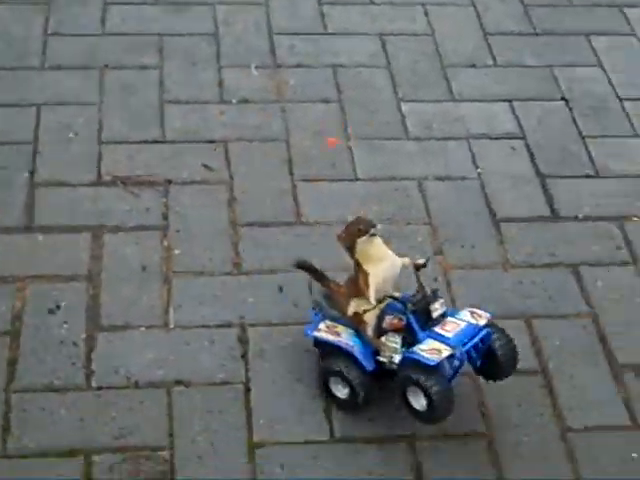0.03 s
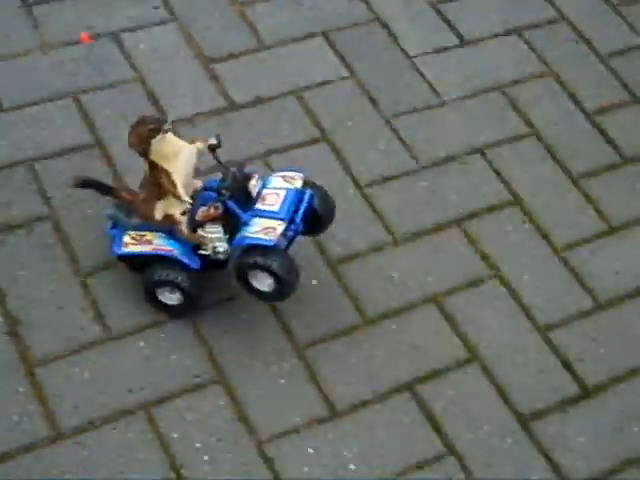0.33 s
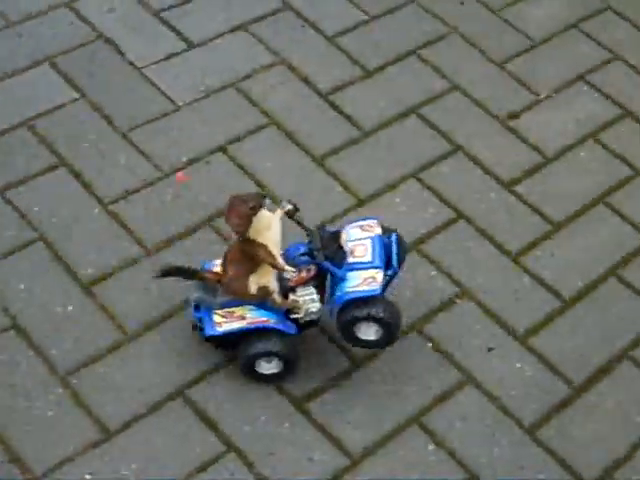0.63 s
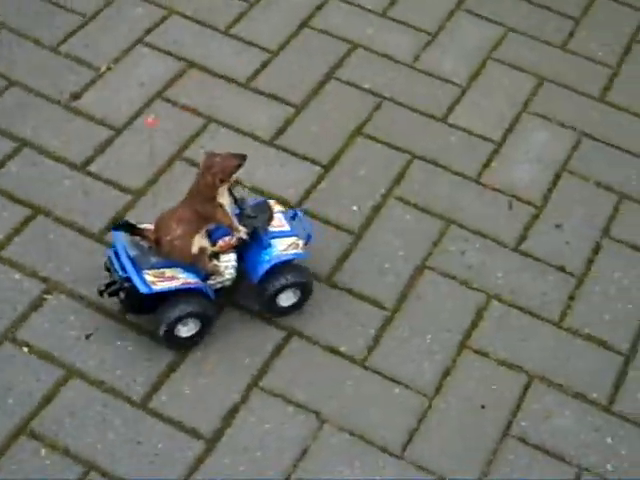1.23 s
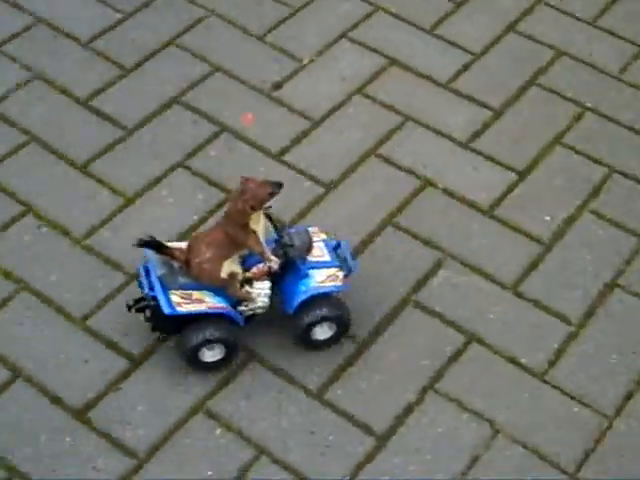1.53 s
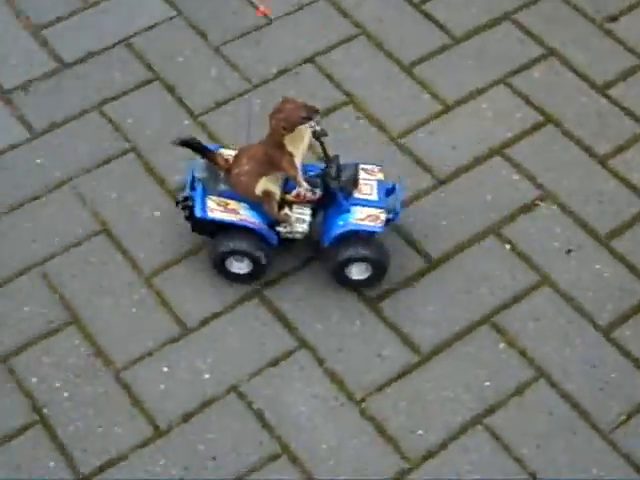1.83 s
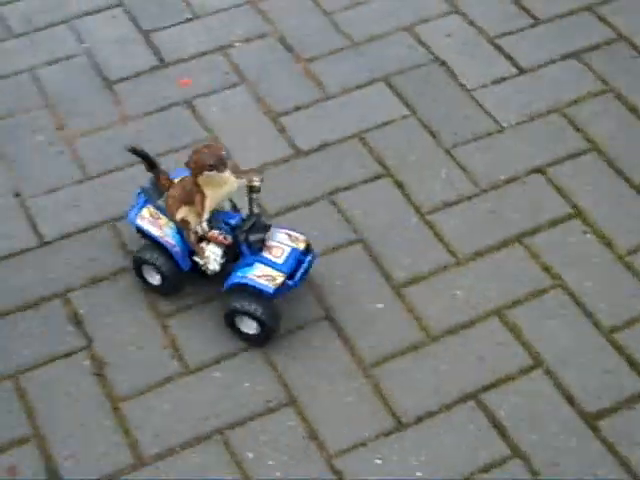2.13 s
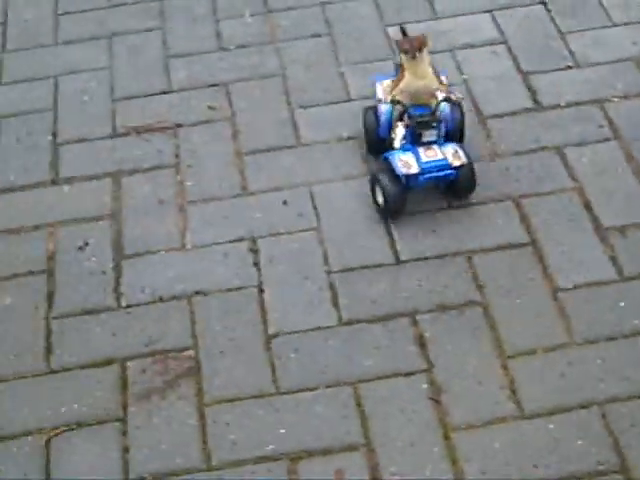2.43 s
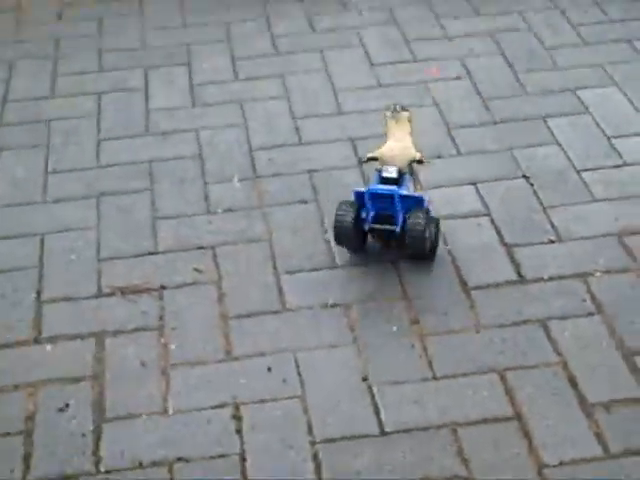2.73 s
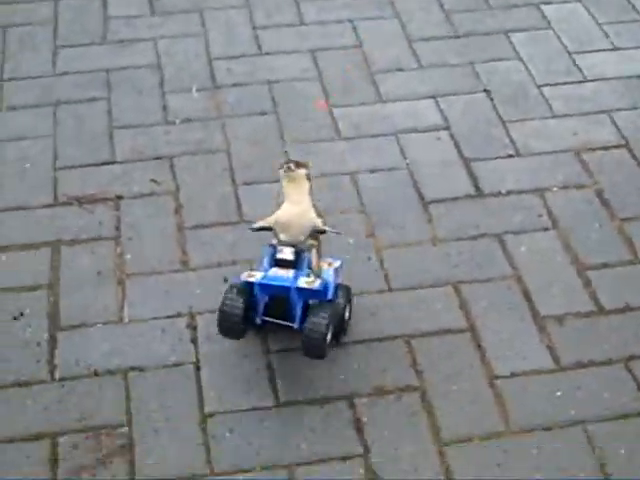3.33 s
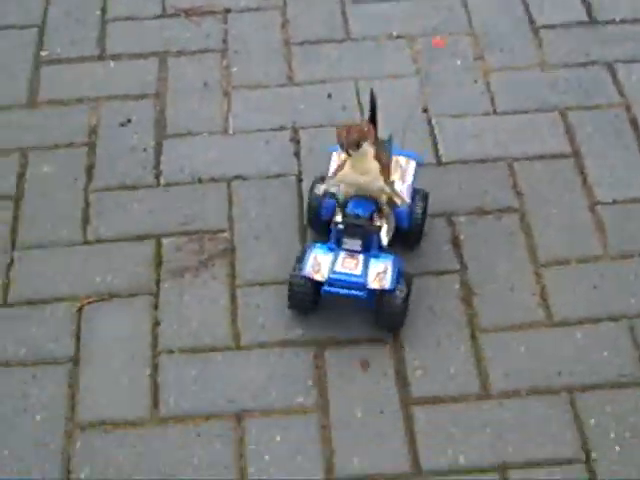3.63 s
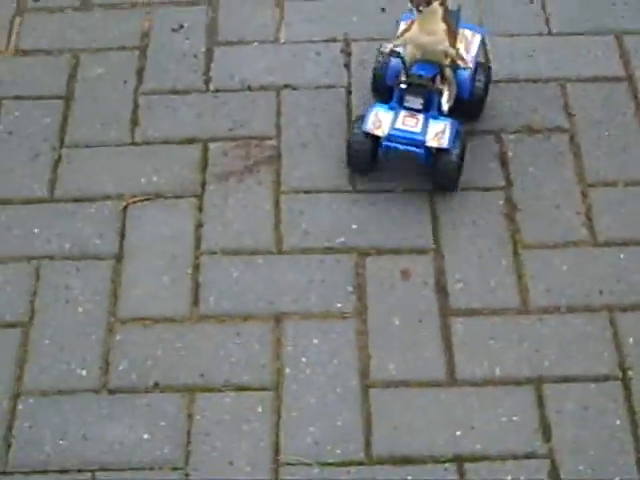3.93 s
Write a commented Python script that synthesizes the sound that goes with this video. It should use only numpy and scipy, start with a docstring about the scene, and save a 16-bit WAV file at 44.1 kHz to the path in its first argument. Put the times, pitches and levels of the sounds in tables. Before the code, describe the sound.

Close to the microphone outdoors, a small toy vehicle's motor whirs with a rough, wavering whine. Its wheels scrape on paving, patter through a run of quick taps and scrape again, while the hollow plastic body rattles over bumps.

```python
"""Outdoors on paving blocks, a battery toy quad bike drives along close by.
Its gears whine and rattle the hollow plastic shell. The tyres scuff and groan, their tread bumps
slap the stone, and the whole toy clatters when it drops or meets a joint in the paving.
Nearby walls echo it, and a faint outdoor rumble lies underneath."""
import sys
import numpy as np
from scipy import signal
from scipy.fft import rfft, irfft
from scipy.io import wavfile
from scipy.ndimage import uniform_filter1d

SR = 44100
rng = np.random.default_rng(int(sys.argv[2]) if len(sys.argv) > 2 else 0)


def materialize(psi):
    """Save the field psi as 16-bit PCM at rate SR to the path in sys.argv[1].

    A 1-D psi becomes a single channel; in a 2-D psi each row is a channel.
    """
    bounded = np.clip(np.atleast_2d(psi).T, -1, 1)
    quanta = np.round(bounded * 32767).astype(np.int16)
    wavfile.write(sys.argv[1], SR, quanta)


N = 176400
TIME = np.arange(N) / SR

# The shell rings in four bands, low to high: boom, hollow, panels, treble.
# Its usual ringing notes in the top two bands: pitch_hz, width_hz, level_db
PANEL_NOTES = [(1350, 320, 0), (1601, 190, 1.5), (1930, 500, -5), (2534, 420, -2), (3110, 670, -4)]
TREBLE_NOTES = [(4410, 670, 0.5), (5330, 800, 0.5), (6100, 820, 0), (7490, 1400, -4)]


def gears():
    """Loose plastic teeth clash unevenly and keep the shell whirring."""
    # How hard they shake each band: time_s, boom_db, hollow_db, panels_db, treble_db
    shaking = [(0,-60.5,-49,-47,-47.5),(0.149,-64,-48,-50.5,-51.5),(.2,-66.5,-50.5,-47,-56),(.4,-66.5,-52,-52,-50.5),(.53,-65.5,-56.5,-57.5,-62),(.7,-65.5,-51,-50.5,-53.5),
               (0.851,-62.5,-57,-50,-49.5),(1.42,-67,-48.5,-54,-54),(1.55,-60.5,-46.5,-47.5,-48.5),(1.76,-70,-49,-50.5,-50.5),(1.87,-67.5,-54.5,-59,-59),
               (2.03,-67,-46,-49,-48.5),(2.15,-66,-54.5,-50,-51),(2.42,-59.5,-53.5,-49,-48),(2.95,-60.5,-54,-47,-48.5),(3.08,-63,-51.5,-48.5,-49),
               (3.158,-67,-55,-54,-52.5),(3.275,-67,-60.5,-58,-61),(3.335,-65.5,-50.5,-47.5,-52),(3.471,-64.5,-55,-53.5,-55),(3.58,-75,-56,-50.5,-55),
               (3.81,-69,-55,-50,-57),(4.0,-68,-48.5,-49,-51)]
    times, *bands = np.transpose(shaking)
    wobble_db, flicker_db, wobble_hz = 3, 1.6, 55
    teeth = clicks(per_s=3200, spread_db=2) * from_db(-1 + wobble_db * drift(wobble_hz))
    levels_db = [np.interp(TIME, times, db) + flicker_db * drift(wobble_hz) for db in bands]
    return shell(teeth * from_db(levels_db))


def gear_whine():
    """The gears' tones glide with motor speed; slack between the teeth makes them rough."""
    # The course of the whine: time_s, pitch_hz, level_db
    glide = [(0,2736,-49),(0.502,2743,-82),(0.802,2814,-43),(1.302,2838,-48),(1.8,2776,-49.5),(2.3,2733,-43.5),
             (2.582,2930,-42),(3.0,3052,-47),(3.25,2842,-59),(4.0,2876,-49.5)]
    # The tones in it: pitch_ratio, blur_hz, level_db
    tones = [(.36, 120.7, -6), (.505, 109, -13), (1, 380.4, -7)]
    times, hz, db = np.transpose(glide)
    phase = 2 * np.pi * np.cumsum(np.interp(TIME, times, hz)) / SR
    whine = sum(from_db(level) * rough_tone(ratio * phase, blur) for ratio, blur, level in tones)
    return from_db(np.interp(TIME, times, db)) * whine


def gear_case():
    """Under steady load, the teeth make the gear case sing for a while."""
    # Sung notes: middle_s, half_length_s, pitch_hz, level_db
    notes = [(1.04, 0.2, 4600, -51.5), (1.1, 0.27, 1359, -53), (2.368, 0.033, 2686, -44),
             (2.881, 0.22, 3380, -53.5)]
    return swelling_tones(notes, blur_hz=276)


def tyre_scuffs():
    """Tyres drag over the gritty stone in short, juddering swells."""
    # Scuffs: middle_s, half_length_s, hollow_db, panels_db, treble_db
    scuffs = [(0.048, 0.092, -68, -44.5, -48.5), (0.127, 0.022, -41.5, -37.5, -41),
              (0.222, 0.0085, -45.5, -59, -42), (0.38, 0.055, -47, -46, -52),
              (0.471, 0.029, -40.5, -38.5, -42), (0.573, 0.026, -43.5, -42, -48.5),
              (0.654, 0.028, -42.5, -41.5, -44), (0.73, 0.014, -41, -39.5, -44.5),
              (0.764, 0.013, -38.5, -35, -34), (0.799, 0.024, -41, -35.5, -35),
              (0.877, 0.018, -54, -41.5, -43), (0.958, 0.023, -45, -44, -42),
              (1.015, 0.027, -42.5, -41.5, -43.5), (1.079, 0.025, -44.5, -40, -47),
              (1.142, 0.021, -48.5, -40, -51), (1.206, 0.022, -47, -38.5, -41),
              (1.271, 0.018, -46, -39, -40.5), (1.327, 0.022, -41, -37.5, -38.5),
              (1.49, 0.022, -39.5, -36, -37), (1.644, 0.039, -44, -38.5, -43),
              (2.796, 0.035, -47, -50, -44), (3.424, 0.022, -38.5, -38.5, -39),
              (3.534, 0.016, -42, -47, -56), (3.672, 0.027, -49, -39.5, -40),
              (3.735, 0.045, -43, -40.5, -43.5), (3.84, 0.014, -42.5, -41, -49),
              (3.946, 0.061, -47, -35, -38)]
    # Shell notes under a sliding tyre: pitch_hz, width_hz, level_db
    panel_notes = [(1445, 390, -3), (2050, 460, -4.5), (2880, 740, -3)]
    treble_notes = [(4500, 700, 0.5), (5440, 1030, -1.5), (6000, 770, -0.5), (7440, 1300, -6.5)]
    swells = sum(np.outer(from_db(db), swell(middle, half)) for middle, half, *db in scuffs)
    grit = clicks(per_s=2200, spread_db=1)
    judder = from_db(-5.5 + 2 * drift(rate_hz=82))
    return contact(swells, grit * judder, panel_notes, treble_notes)


def tread_slaps():
    """Each tread bump lands with a short, bright rasp and a tiny squeak at its own pitch."""
    # Landings: start_s, level_db, hollow_extra_db
    landings = [(1.3611, -30.5, -18), (1.53, -30, -14), (1.696, -30.5, -0.5), (1.74, -32.5, 1.5),
                (1.7849, -32.5, -0.5), (1.8301, -33, -3.5), (1.9584, -33.5, -0.5), (1.9953, -31.5, 2),
                (2.0374, -34, -13), (2.0598, -37, 8.5), (2.12, -28, -9), (2.158, -28, -21),
                (2.1786, -30.5, -1.5), (2.2339, -28, -6), (2.2685, -28.5, -3), (2.2947, -36.5, -0.5),
                (2.3217, -37, -5), (2.3386, -29, -5), (2.373, -29, -17), (2.3974, -31.5, -20),
                (2.438, -31, 0), (2.4832, -29, -22), (2.5215, -29, -25), (2.5482, -29, -4),
                (2.6453, -31.5, -1), (2.6827, -29.5, -6.5), (2.709, -28, -19), (2.835, -31, -10),
                (2.8508, -34, -15), (2.875, -31.5, -18), (2.8932, -32, -16), (2.923, -31, -8),
                (2.9909, -35.5, -1), (3.0523, -30.5, -9), (3.2278, -37.5, 3.5), (3.923, -31.5, -11)]
    # Shell notes under a landing bump: pitch_hz, width_hz, level_db
    panel_notes = [(1410, 360, -2), (1910, 120, -4), (2896, 460, 3)]
    treble_notes = [(4490, 390, 2.5), (5700, 560, 1.5), (6040, 330, 2), (7180, 890, 2.5)]
    hollow_db, panels_db, treble_db = -9.5, -11, -13.5
    slaps, squeaks = 0, 0
    for start, db, extra_db in landings:
        touch = from_db(db) * burst(start, attack_s=0.00092, hold_s=0.003, fade_s=0.0062)
        slaps += np.outer(from_db([hollow_db + extra_db, panels_db, treble_db]), touch)
        squeak_hz = rng.uniform(5290, 6185)
        squeaks += touch * np.sin(2 * np.pi * squeak_hz * (TIME - start))
    return contact(slaps, chatter(), panel_notes, treble_notes) + from_db(-14) * squeaks


def knocks():
    """The toy hits the paving in a quick cluster of taps, then its loose parts rattle."""
    # Hits: start_s, length_s, hollow_db, panels_db, treble_db
    hits = [(0.104,0.0028,-31,-37,-28),(0.11,0.0051,-33.5,-35.5,-36.5),(0.45,0.002,-43,-37,-32.5),(0.462,0.0052,-43,-51,-44),
            (1.4052,0.0026,-37,-36,-34.5),(1.4451,0.0062,-35.5,-35,-36),(1.4785,0.0036,-33.5,-36,-39),(1.629,0.005,-28.5,-32.5,-32.5),
            (1.6347,0.0018,-23,-34,-31.5),(1.9024,0.0075,-38.5,-44.5,-49),(3.2857,0.0075,-46,-34.5,-39),(3.3181,0.001,-39.5,-44,-43),
            (3.3478,0.0028,-56,-36,-44.5),(3.4264,0.0016,-36,-38.5,-49)]
    blows = 0
    for start, length, *db in hits:
        blow = burst(start, attack_s=0.00032, hold_s=length, fade_s=0.00064)
        rattle = burst(start + length, attack_s=0.00032, hold_s=length, fade_s=0.011)
        blows += np.outer(from_db(db), blow + from_db(-14) * rattle)
    return contact(blows, chatter())


def pings():
    """A small, stiff part rings briefly on hard landings."""
    # Rings: start_s, pitch_hz, level_db
    rings = [(3.2883, 5200, -36), (3.301, 4850, -31), (3.3177, 5230, -30)]
    sound = 0
    for start, hz, db in rings:
        loudness = from_db(db) * burst(start, attack_s=0.00032, hold_s=0, fade_s=0.002)
        sound += loudness * np.sin(2 * np.pi * hz * (TIME - start))
    return sound


def tyre_groans():
    """A dragged tyre sticks and slips at an unsteady pitch."""
    # Groans: middle_s, half_length_s, pitch_hz, level_db
    groans = [(0.068, 0.034, 1480, -46.5), (0.36, 0.04, 1500, -47), (0.773, 0.025, 1240, -42.5),
              (3.39, 0.01, 1090, -45), (3.95, 0.04, 1440, -40)]
    return swelling_tones(groans, blur_hz=212.7)


def shell(forces, panel_notes=PANEL_NOTES, treble_notes=TREBLE_NOTES):
    """Four forces, one for each band, set the plastic shell ringing."""
    # Ringing notes in the two low bands: pitch_hz, width_hz, level_db
    boom_notes = [(304, 173, 2)]
    hollow_notes = [(720, 101, -3.5), (867, 119, -1), (1008, 146, -0.5)]
    # The range each band gives off: low_hz, high_hz
    ranges = [(170, 520), (620, 1274), (1150, 3520), (3800, 8860)]
    bands = (boom_notes, hollow_notes, panel_notes, treble_notes)
    tap = signal.unit_impulse(SR // 10)
    sound = 0
    for force, notes, edges in zip(forces, bands, ranges):
        ring = 0  # how this band answers one tap
        for k, (hz, width, db) in enumerate(notes):
            fade = np.exp(-np.pi * width / SR)  # wider notes die sooner
            feedback = [1, -2 * fade * np.cos(2 * np.pi * hz / SR), fade ** 2]
            note = (1 - fade ** 2) * signal.lfilter([1, 0, -1], feedback, tap)
            ring += (-1) ** k * from_db(db) * note
        ring = signal.sosfilt(signal.butter(2, edges, "band", fs=SR, output="sos"), ring)
        sound += signal.fftconvolve(force, ring / np.linalg.norm(ring))[:N]
    return sound


def contact(strengths, taps, panel_notes=PANEL_NOTES, treble_notes=TREBLE_NOTES):
    """Tiny taps on the stone shake the shell; the boom is a weaker share of the panels' force."""
    hollow, panels, treble = strengths * taps
    return shell([from_db(-19) * panels, hollow, panels, treble], panel_notes, treble_notes)


def clicks(per_s, spread_db):
    """Tiny random impacts of uneven size."""
    sizes = from_db(spread_db * np.minimum(rng.exponential(1, N), 4))
    signs = rng.choice([-1, 1], N)
    return unit_power(sizes * signs * (rng.random(N) < per_s / SR))


def chatter():
    """Dense, hard taps whose force is evened out over about 3 ms."""
    taps = clicks(per_s=4600, spread_db=2)
    return taps / np.sqrt(uniform_filter1d(taps ** 2, size=130) + 1e-3)


def swelling_tones(notes, blur_hz):
    """Rough tones that each fade in and out."""
    return sum(from_db(db) * swell(middle, half) * rough_tone(2 * np.pi * hz * TIME, blur_hz)
               for middle, half, hz, db in notes)


def rough_tone(phase, blur_hz):
    """A tone whose strength and pitch waver."""
    return unit_power(drift(blur_hz) * np.cos(phase) + drift(blur_hz) * np.sin(phase))


def burst(start, attack_s, hold_s, fade_s):
    """A level that rises, holds, then dies away."""
    age = TIME - start
    return np.clip(age / attack_s, 0, 1) * np.exp(-np.clip((age - attack_s - hold_s) / fade_s, 0, 20))


def swell(middle_s, half_length_s):
    """A smooth rise and fall."""
    return np.exp(-np.minimum(((TIME - middle_s) / half_length_s) ** 2, 20))


def drift(rate_hz):
    """A random wander with a typical size of 1."""
    points = rng.standard_normal(N // 20)
    return unit_power(np.interp(TIME * rate_hz * 2, np.arange(len(points)), points))


def from_db(db):
    """Turn decibels into a multiplier."""
    return 10 ** (np.asarray(db) / 20)


def unit_power(x):
    """Scale a signal to an average power of 1."""
    return x / np.sqrt(np.mean(x ** 2) + 1e-20)


def wall_echoes(sound):
    """Nearby walls send the sound back, later and quieter."""
    # Echoes: delay_s, level_db
    echoes = [(.017, -18), (.034, -19)]
    return sum(from_db(db) * np.interp(TIME - delay, TIME, sound, left=0) for delay, db in echoes)


def outdoor_rumble():
    """A steady, dull background noise."""
    # Its balance from low to high: pitch_hz, level_db
    balance = [(20, -2), (60, -0.5), (100, -5.5), (250, -5), (500, -12), (2000, -6.5), (9000, -31)]
    hz, db = np.transpose(balance)
    all_hz = np.arange(N // 2 + 1) * SR / N
    gain = from_db(np.interp(np.log(all_hz + 1), np.log(hz), db))
    rumble = irfft(rfft(rng.standard_normal(N)) * gain, N)
    return from_db(-56) * unit_power(rumble)


def scene():
    """The toy, its echoes and the background, in mono."""
    drive = gears() + gear_whine() + gear_case()
    toy = drive + tyre_scuffs() + tread_slaps() + knocks() + pings() + tyre_groans()
    return (toy + wall_echoes(toy) + outdoor_rumble())[None]


def record(dry):
    """A small microphone dulls the treble; a steep cut removes the very top."""
    dull_hz, cut_hz = 7900, 8750
    dull = signal.sosfilt(signal.butter(8, dull_hz, fs=SR, output="sos"), dry)
    return signal.sosfilt(signal.ellip(10, .2, 80, cut_hz, fs=SR, output="sos"), dull)


dry = scene()
out = record(dry)
materialize(out)
```